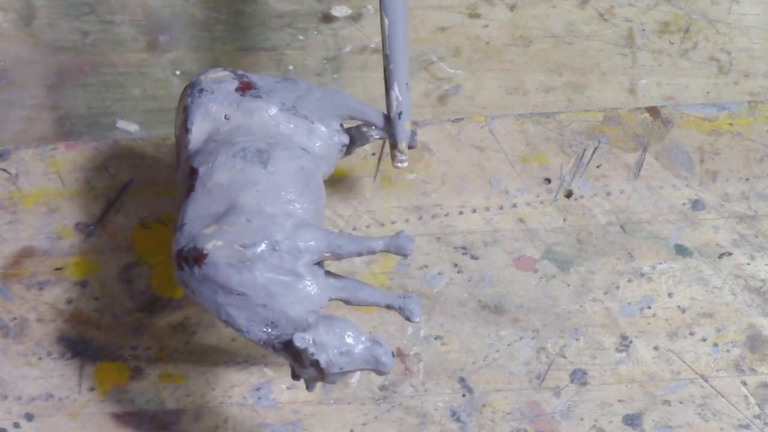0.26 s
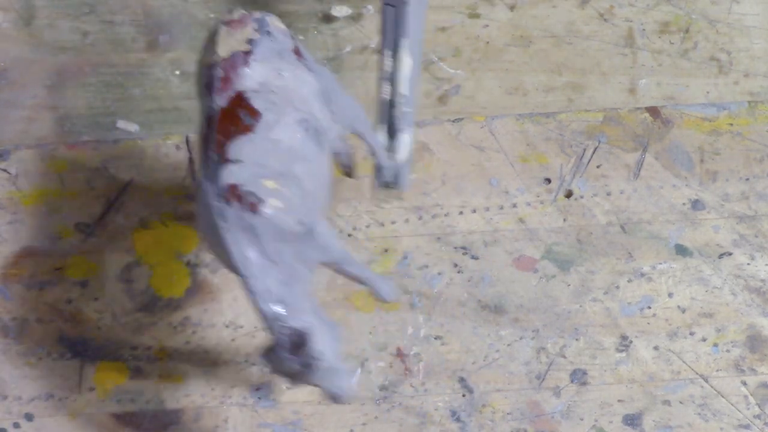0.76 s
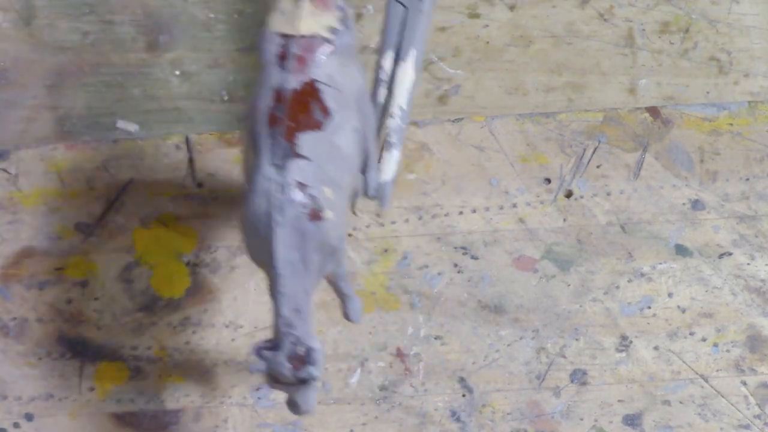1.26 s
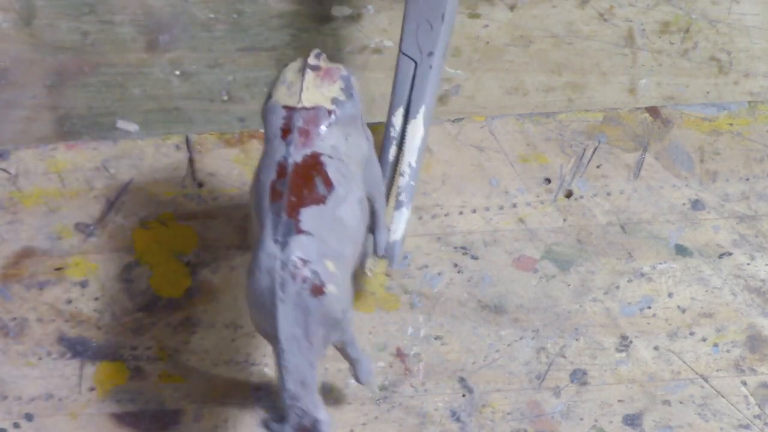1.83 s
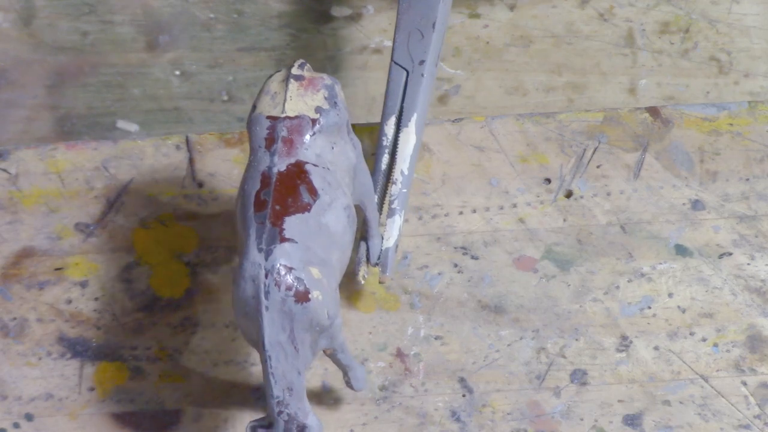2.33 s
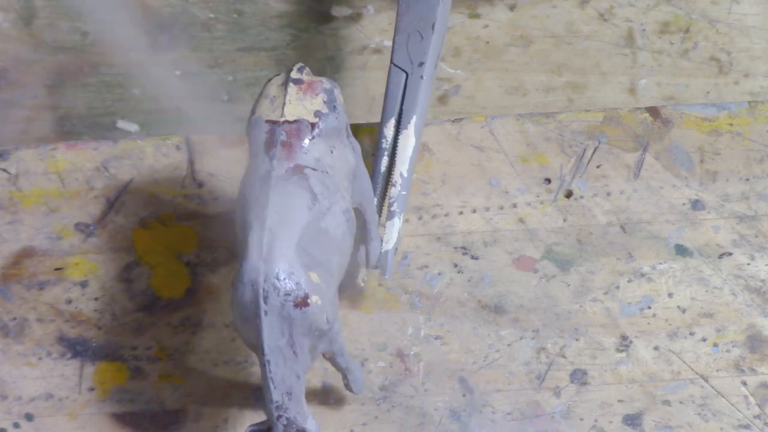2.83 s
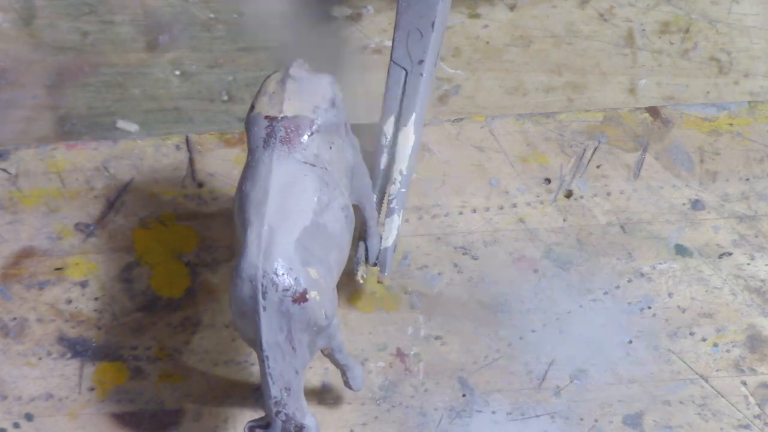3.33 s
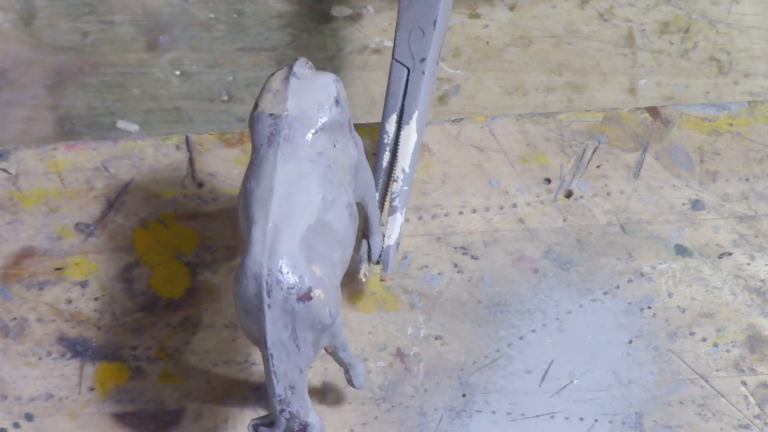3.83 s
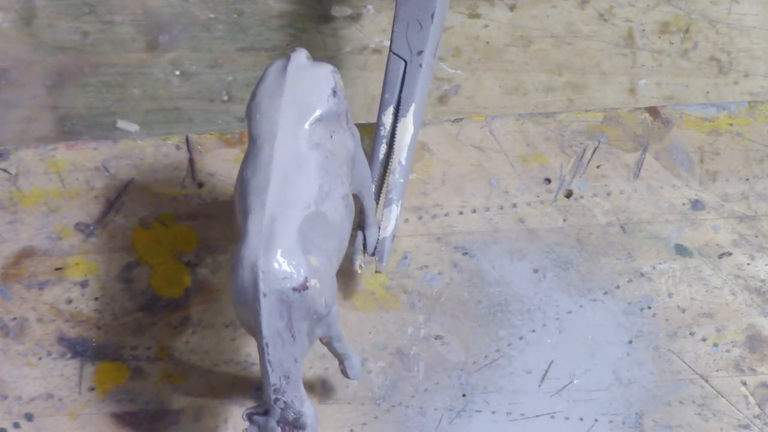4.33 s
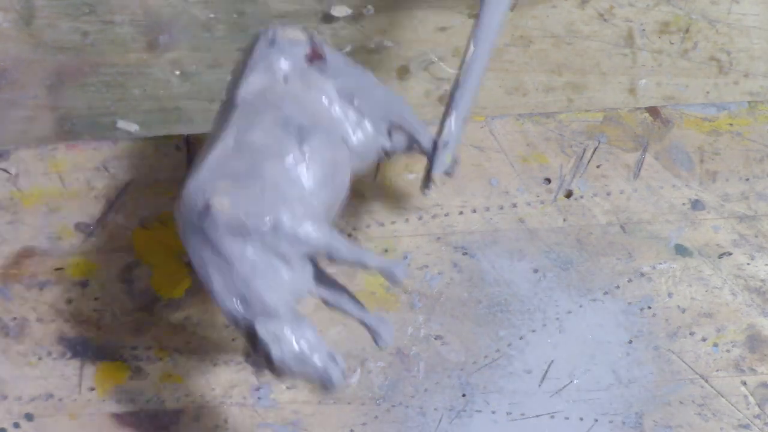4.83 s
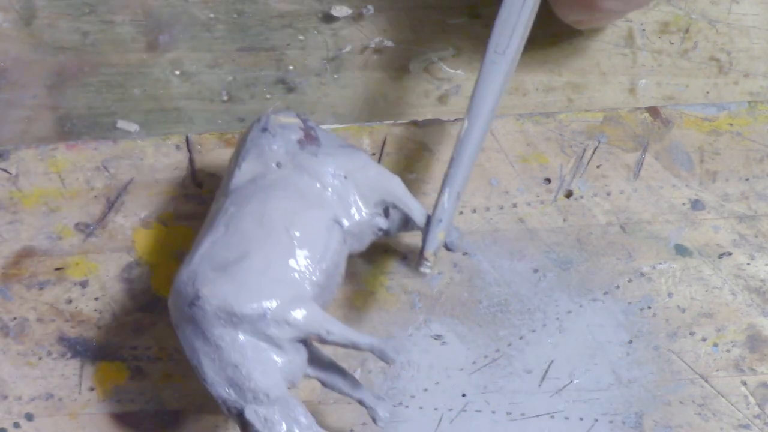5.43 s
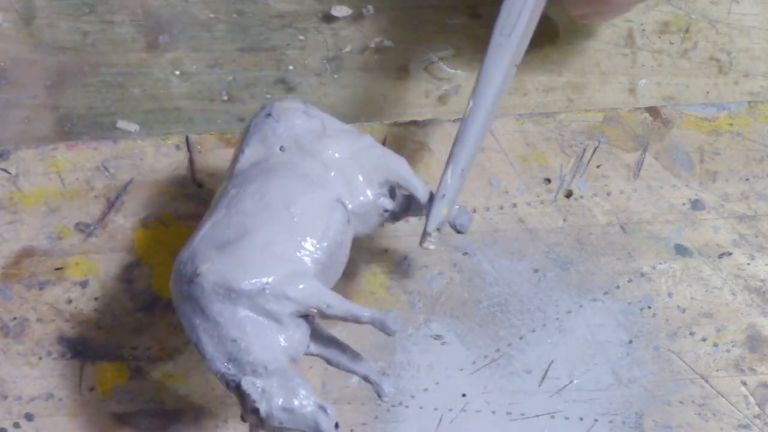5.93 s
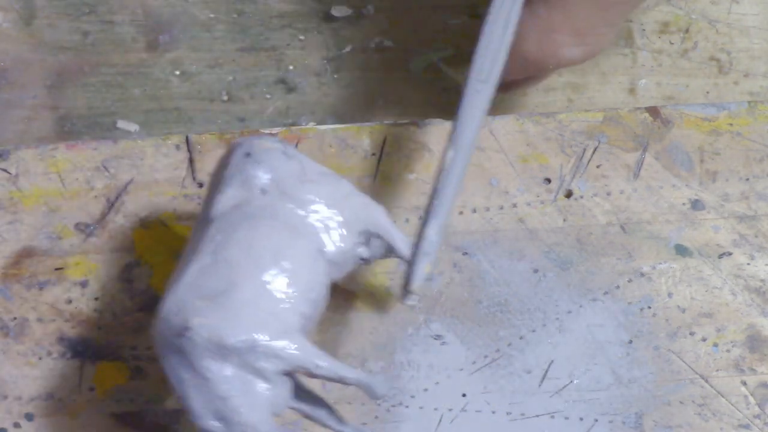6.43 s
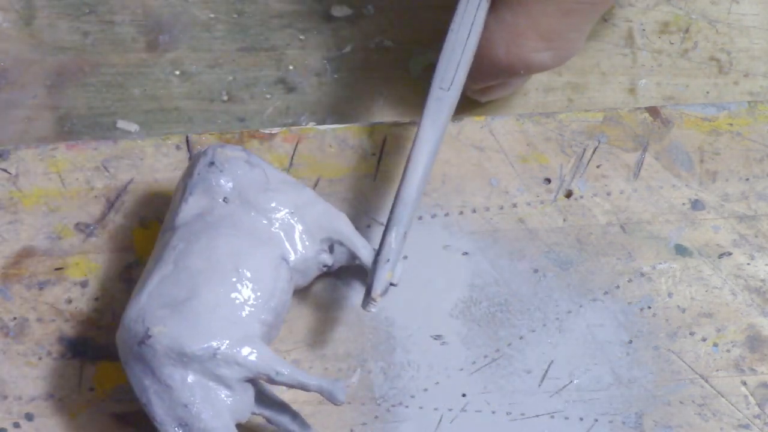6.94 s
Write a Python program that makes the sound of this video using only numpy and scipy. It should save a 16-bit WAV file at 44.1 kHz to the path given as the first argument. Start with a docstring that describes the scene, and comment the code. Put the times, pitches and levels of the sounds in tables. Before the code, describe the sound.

Hard metallic shaking of a paint can, its ball cracking and ringing, settles into ticks and is followed by seven brief, quiet aerosol bursts.

```python
"""A can of spray paint is shaken close to the microphone in a small workshop with a steady murmur.
Each stroke is noise cracks and ringing can modes as the ball hits, rebounds and skids; a limiter squashes it.
As the can is drawn back the room comes up, the rattle thins into light taps and low sine bubbles gurgle.
Seven short puffs of shaped noise follow, each a thin leak and then an open jet, with the ball ticking
in between."""
import sys
import numpy as np
from scipy import signal
from scipy.fft import rfft, irfft
from scipy.io import wavfile
from scipy.ndimage import uniform_filter1d

SR = 44100
rng = np.random.default_rng(int(sys.argv[2]) if len(sys.argv) > 2 else 0)


def unload_wav(signal):
    """Save mono or channel-first audio to the path in sys.argv[1] as 16-bit WAV at rate SR, clipped to [-1, 1]."""
    wavfile.write(
        sys.argv[1],
        SR,
        np.round(np.clip(np.atleast_2d(signal).T, -1, 1) * 32767).astype(np.int16),
    )


N = 316682

# spectrum of the workshop background: (frequency [Hz], relative density [dB per Hz])
FLOOR_COLOUR = [(15, -47), (25, -19.5), (120, -12), (157, -6), (190, -8), (223, -3), (354, -1.5), (416, -3),
                (451, -1), (754, -4), (1040, -6.5), (1230, -4.5), (3340, -14.5), (8830, -23), (16000, -39)]
# low-end fullness added to that background: (frequency [Hz], lift [dB])
BASS_FULLNESS = [(25, 0), (60, 1), (110, 6.5), (200, 3.5), (400, 1.5)]
# reverberation of the workshop: (frequency [Hz], t60 [s])
ROOM_DECAY = [(200, 0.75), (700, 0.75), (2000, 0.42), (5000, 0.41), (9000, 0.26), (15000, 0.32)]
# bubbles as the paint settles: (time [s], pitch [Hz], starting level [dB], t60 [s])
BUBBLES = [(2.056, 331, -40.5, 0.096), (2.093, 262.5, -43.5, 0.18), (2.150, 323, -48, 0.15),
           (2.184, 273, -51, 0.2)]
# rattle after the shaking stops: (time [s], base level of the taps [dB])
RATTLE_DECAY = [(0.92, -15), (0.936, -21), (1.048, -27), (1.18, -20.5), (1.214, -26), (1.282, -23),
                (1.482, -60), (1.768, -40), (1.92, -55)]
# knocks of the ball: single knocks of the loose ball, and a few late rebounds after strokes # (such as those at
# 0.472 and 0.488 s): (time [s], strike level [dB], tilt [dB per octave], # ring of the wall [dB], centre of a
# bright bump in the strike's colour [Hz], height of that bump [dB])
BALL_KNOCKS = [(0.0248, -20, 3, 17, 3100, -2), (0.0334, -2, 1, 5.5, 11600, 13), (0.059, 0, -2, 4, 6300, 9),
               (0.0746, 0, 1.5, -5, 11200, -2), (0.1717, 7.5, 3, 15, 10700, 5),
               (.405, 7.5, 2, -14, 5400, 1), (0.4209, 6, 1, -10, 3020, 7), (.472, 2, -2, 4, 8000, 13),
               (.488, -1.5, -3.5, -9, 10600, 8), (.5894, -4, -8, -10, 3620, 19),
               (0.674, -3, -0.5, 6, 3600, -7), (0.9153, 1, -2, -12, 5870, 11),
               (0.9702, -7.5, -2.5, 7, 9700, 8), (1.0117, -13.5, -0.5, 2, 4860, 6),
               (1.0716, -12.5, 3.5, 4, 7460, 8), (1.0903, -10, 1, 10, 6100, 4.5),
               (1.1343, -5, -1.5, 13, 10500, 1), (1.176, -10, 2, -5, 6160, 10.5),
               (1.279, -14.5, -0.5, 6, 6500, 9), (1.3378, -19.5, 0, 1.5, 6300, 1.5),
               (1.5678, -33, -2.5, 7, 10450, -3), (1.5814, -32.5, -1.5, -1, 3600, 5),
               (1.6613, -31, 2, -4.5, 4830, 5), (1.725, -32, -6, -8, 3030, 8),
               (1.758, -31.5, 1.5, -2, 6000, 7), (1.7882, -34.5, -3, 2.5, 3220, 28),
               (1.9715, -20, -3.5, 8.5, 7240, 8), (1.9963, -31, -7, 10, 6150, -2),
               (2.0276, -35.5, -2, -4, 4630, 8), (2.0763, -34.5, -6, 9, 8400, 7),
               (3.891, -31, 14, -6, 6010, 5), (4.2203, -26.5, 1, 8.5, 3710, 5),
               (4.2611, -32.5, 7, 3, 3690, 12.5), (4.3155, -37, 0, 5, 3850, 7.5),
               (5.5367, -31.5, 3, 4.5, 3870, 4), (5.5982, -41.5, 5, -15, 3800, 9),
               (5.9016, -32.5, -1, 3, 3850, 0.5), (5.91, -38, -1.9, 4, 2970, 10),
               (5.943, -36.5, 1.5, -5, 4050, 25), (6.9022, -23, 3, 1.5, 4130, 11.5),
               (6.9279, -29, 1.5, 0, 9100, 6)]
# presses of the nozzle: (time [s], leak time [s], opening time [s], open time [s], leak level [dB],
# jet level [dB], rush of the paint cone [dB], lower hump [Hz], upper hump [Hz],
# delay of the bounce off the sprayed figure [s])
PRESSES = [ (2.786, 0.028, 0.066, 0.11, -44, -32.5, -35, 7320, 9050, 0.0012),
           (3.302, 0.022, 0.033, 0.15, -46.5, -33, -37, 5280, 8900, 0.0018),
           (3.888, 0.011, 0.037, 0.13, -43, -32.5, -35, 7080, 9140, 0.001),
           (5.155, 0.046, 0.0095, 0.13, -44, -34, -38, 7700, 9630, 0.00093),
           (5.68, 0.058, 0.013, 0.056, -45.5, -34.5, -39, 7370, 10500, 0.001),
           (6.495, 0.049, 0.036, 0.14, -45.5, -33, -39.5, 6550, 9200, .00089),
           (6.937, 0.024, 0.078, 0.084, -39.5, -34, -36.5, 6600, 8950, 0.0011)]
# spectrum of the leaking valve: (frequency [Hz], relative density [dB per Hz])
LEAK_COLOUR = [(100, -9), (1500, -6), (3000, -5.5), (4500, 0.5), (8500, 3), (12000, -7), (16000, -13)]
# spectrum of the open jet: (frequency [Hz], relative density [dB per Hz])
JET_COLOUR = [(100, -16), (1500, -9.5), (3200, -18), (3800, -0.5), (4500, 0), (5000, -4), (5600, 3),
              (8000, 3), (11000, 1.5), (12000, -4), (14000, -8), (16000, -11)]
# spectrum of the rushing paint cone: (frequency [Hz], relative density [dB per Hz])
CONE_COLOUR = [(40, -24), (115, -24), (250, -3), (400, -1.5), (750, -5.5), (1150, -1.5), (1580, 2.5),
               (2000, 0), (2350, 2.5), (2800, -3.5), (5000, -1.5), (16000, -40)]
# colour of ball on tin: (frequency [Hz], relative density [dB per Hz])
STRIKE_COLOUR = [(40, -41), (160, -29.5), (290, -14.5), (480, -11), (800, -3.5), (1200, 6), (1900, 2.5),
                 (3000, 1), (4800, -2), (5800, 0.5), (8000, -6.5), (10000, -11.5), (13000, -23),
                 (16000, -32)]
# lasting modes of the can: (frequency [Hz], relative level [dB], t60 [s])
CAN_MODES = [(544, -21.5, .3), (892, -15.5, 0.41), (1340, -11.5, 0.1), (1400, -11, 0.1), (1800.5, -8, 0.32),
             (1930, -8.5, 0.084), (2260, -8.5, 0.19), (2447, 5, 0.17), (2330, -3, .17), (2592, -4, 0.041),
             (2468, -12, 0.057), (3436, -11.5, 0.15), (3620, -6, 0.29), (3900, -3.5, 0.23), (5742, -6, .1)]
# strokes of the hand, each throwing the ball against an end of the can: (time [s], strike level [dB],
# tilt [dB per octave], ring of the wall [dB], centre of a bright bump in the strike's colour [Hz],
# flight to the first rebound [s], ring on that rebound [dB], flight to the second rebound [s],
# skid length [s], skid level [dB], pitch of the scrape [Hz])
HAND_STROKES = [(0.0451, 3.5, 0.3, -2, 10860, 0.0049, -2, 0.0082, 0.016, -19, 2372),
                (0.1443, 14, 3, -0.5, 4832, 0.0066, 11, 0.0084, .062, -10.5, 2958),
                (0.2363, 7.5, -0.5, -2, 7530, 0.0066, -3.5, 0.0052, 0.049, -15, 1952),
                (0.366, 14, 3.5, 11.5, 4270, 0.0054, -9, 0.0032, 0.072, -12, 4215),
                (0.443, 8.5, -1.6, 9.5, 5500, 0.0095, -3, .0065, 0.036, -11, 2169),
                (0.5547, 17, 4, -3.5, 3550, 0.0043, -11.5, 0.018, 0.075, -8.5, 3511),
                (0.6385, 8, -0.3, 6.5, 5760, 0.0075, -4, 0.011, .045, -12.5, 2300),
                (.7281, 14.5, 1, 2, 5890, 0.016, 16, 0.021, 0.055, -7.5, 2920),
                (.798, 4.5, 3, -1, 4340, 0.0078, -19.5, 0.016, 0.042, -10, 3007),
                (0.8773, 2, -2, 17.5, 8200, 0.0052, -16, .008, 0.016, -40, 2300)]

FLOOR_DB = -57
# the first rebound is about as hard as the blow; the second glances off, slowed by the paint on its way
REBOUND_DB, DRAG_DB_PER_S, GLANCE_RING_DB = 0.5, 450, -2
# the skid starts just after the blow; each blow carries a faint low pulse
SKID_DELAY_S, PULSE_DB, PULSE_S = 0.009, -39, 0.0044
# after a knock the ball rolls a little
ROLL_S, ROLL_LOSS_DB, ROLL_HZ = 0.041, 28.5, 2800
CUTOFF_HZ = 15850
T = np.arange(N) / SR
# frequencies [Hz] and times [s] of the short-time spectra of one puff
BINS = np.fft.rfftfreq(256, 1 / SR)
FRAMES = np.arange(300)[:, None] * 64 / SR


def amp(db):
    """Decibels to gain."""
    return 10 ** (np.asarray(db) / 20)


def unit(x):
    """Scales to rms 1."""
    return x / np.sqrt(np.mean(x ** 2) + 1e-20)


def read(points, hz):
    """Reads a table on a log-frequency axis."""
    f, value = np.transpose(points)
    return np.interp(np.log(hz + 1), np.log(f + 1), value)


def hump(hz, centre_hz, width_hz):
    """A resonance-shaped bump of height 1."""
    return 1 / (1 + (2 * (hz - centre_hz) / width_hz) ** 2)


def add(mix, s, sound):
    """Mixes a sound in at time s [s]."""
    part = mix[max(round(s * SR), 0):][:len(sound)]
    part += sound[:len(part)]


def noise(level_db, size):
    """Noise of rms 1 coloured by the function level_db(Hz)."""
    spectrum = rfft(rng.standard_normal(size))
    return unit(irfft(spectrum * amp(level_db(np.fft.rfftfreq(size, 1 / SR))), size))


def waver(rate_hz, size):
    """Random motion of rms 1, mostly slower than rate_hz."""
    return noise(lambda hz: -20 * np.log10(1 + (hz / rate_hz) ** 2), size)


def evolving(level_db):
    """Noise of rms 1 whose spectrum changes from frame to frame."""
    real, imaginary = rng.standard_normal((2, *level_db.shape))
    z = (real + 1j * imaginary) * amp(level_db)
    return unit(signal.istft(z.T, nperseg=256, noverlap=192)[1])


def causal(level_db):
    """The sharpest causal (minimum-phase) impulse response with this spectrum."""
    log_gain = np.log(amp(np.r_[level_db, level_db[-2:0:-1]]))
    return np.fft.ifft(np.exp(np.conj(signal.hilbert(log_gain)))).real


def ramp(t, start, length):
    """A smooth step from 0 to 1."""
    return np.sin(np.pi / 2 * np.clip((t - start) / max(length, 1e-3), 0, 1)) ** 2


def background():
    """The steady workshop: coloured noise whose level wavers slightly."""
    murmur = noise(lambda hz: read(FLOOR_COLOUR, hz) + read(BASS_FULLNESS, hz), N)
    return amp(FLOOR_DB + 0.59 * waver(6, N)) * murmur


def workshop(x, tail_db, bench_db, build_s=0.0051):
    """Adds a few quick reflections from the bench and a diffuse tail whose bands decay at their own rates."""
    size = SR * 3 // 4
    hz, t, z = signal.stft(rng.standard_normal(size), SR, nperseg=256)
    decay = amp(-60 * t / read(ROOM_DECAY, hz)[:, None])
    tail = signal.istft(z * decay, SR, nperseg=256)[1][:size]
    tail = unit(tail * ramp(np.arange(size) / SR, 0.00076, build_s)) / np.sqrt(size)
    bench = np.zeros(size)
    arrivals = (SR * rng.uniform(0.002, 0.014, size=8)).astype(int)
    bench[arrivals] = rng.choice([-1, 1], size=8) / np.sqrt(8)
    diffuse = signal.fftconvolve(amp(tail_db) * x, tail)
    reflections = signal.fftconvolve(amp(bench_db) * x, bench)
    return x + (diffuse + reflections)[:N]


def gurgle():
    """Large bubbles ring low inside the can as decaying sines."""
    out, t = np.zeros(N), np.arange(SR // 4) / SR
    for s, hz, db, t60 in BUBBLES:
        add(out, s, amp(db - 60 * t / t60) * ramp(t, 0, 0.009) * np.sin(2 * np.pi * hz * t))
    return out


def settling(over_db=3.5, spread_db=1.5, tilt_db=-0.7, ring_db=2, count=50):
    """Light, uneven taps of the ball as it comes to rest."""
    out, (times, levels) = np.zeros(N), np.transpose(RATTLE_DECAY)
    steps = (np.arange(count) + rng.random(count)) / count  # one tap at random in each equal slot
    for s in times[0] + (times[-1] - times[0]) * steps:
        db = np.interp(s, times, levels) + over_db + spread_db * rng.standard_normal()
        add(out, s, stray(db, tilt_db, ring_db))
    return out


def knocking():
    """The ball knocks, loose as the can moves or rebounding late after a stroke, and rolls on briefly."""
    out = np.zeros(N)
    for s, db, tilt_db, ring_db, bright_hz, bright_db in BALL_KNOCKS:
        add(out, s, strike(db, tilt_db, ring_db, bright_hz, bright_db))
        add(out, s, amp(db - ROLL_LOSS_DB) * skid(ROLL_S, ROLL_HZ))
    return out


def puff(leak_time, opening, open_time, leak_db, jet_db, cone_db, low_hz, high_hz, bounce_s):
    """The valve leaks, opens into a sputtering jet over the rush of the paint cone, and closes."""
    # nearly constant within a puff: its colour sits about 1 % higher or lower
    shift = 1 + 0.0094 * waver(5, len(FRAMES))[:, None]
    # the hiss bounces off the sprayed figure, which combs the spectrum
    comb_db = 2.1 * np.cos(2 * np.pi * BINS * bounce_s * shift)
    # patches of the spectrum flutter, smoothed over 18 frames and 2 bins
    patches = uniform_filter1d(rng.standard_normal(comb_db.shape), size=18, axis=0)
    flutter_db = 2.4 * unit(uniform_filter1d(patches, size=2, axis=1))
    humps_db = 4 * hump(BINS, low_hz * shift, 800) + 4.9 * hump(BINS, high_hz * shift, 560)
    # the top of the hiss comes last, as the paint atomises fully
    dull_db = -4 * (1 - ramp(FRAMES, leak_time, 0.061)) * np.clip((BINS - 9000) / 4000, 0, 1)
    jet = amp(jet_db) * evolving(read(JET_COLOUR, BINS) + humps_db + comb_db + flutter_db + dull_db)
    size = len(jet)
    t = np.arange(size) / SR
    leak_hiss = evolving(read(LEAK_COLOUR, BINS) + comb_db + flutter_db)
    leak = amp(leak_db + 0.5 * waver(90, size)) * leak_hiss

    def cone_level(hz):
        # the flow also sets the can wall ringing
        wall_db = 6.8 * hump(hz, 2350, 50.8) + 5 * hump(hz, 2403, 49.7) + 3 * hump(hz, 1640, 141)
        return read(CONE_COLOUR, hz) + wall_db
    cone = amp(cone_db) * noise(cone_level, size)
    sputter = amp(1.1 * waver(40, size) + 0.74 * waver(490, size))
    flow = ramp(t, leak_time, opening) * sputter
    pressed = ramp(t, 0, 0.0081) * (1 - ramp(t, leak_time + open_time - 0.006, 0.03))
    return pressed * (leak + flow * (jet + cone))


def spray():
    """All presses of the nozzle."""
    out = np.zeros(N)
    for s, *press in PRESSES:
        add(out, s, puff(*press))
    return out


def skid(length, scrape_hz, contacts_per_s=900, scrape_db=8):
    """The ball chatters along the tin in a stream of tiny contacts."""
    size, hz = SR // 6, np.fft.rfftfreq(1024, 1 / SR)
    t = np.arange(size) / SR
    contacts = (rng.random(size) < contacts_per_s / SR) * rng.exponential(size=size)
    envelope = signal.fftconvolve(contacts, np.exp(-t / 0.0015))[:size]
    chatter = envelope * rng.standard_normal(size)
    colour = read(STRIKE_COLOUR, hz) + scrape_db * hump(hz, scrape_hz, 1400)
    scrape = signal.fftconvolve(chatter, causal(colour))[:size]
    return unit(scrape) * ramp(t, 0, 0.011) * (1 - ramp(t, length - 0.02, 0.024))


def strike(db, tilt_db, ring_db, bright_hz, bright_db, crack_s=0.0014, shiver_s=0.014, shiver_db=-17,
           modes_db=-28, crest_db=7):
    """A noise crack for many damped shell modes, a brief shiver of the tin, and a few lasting tones."""
    t, hz = np.arange(SR // 3) / SR, np.fft.rfftfreq(1024, 1 / SR)
    mode_hz, mode_db, mode_t60 = np.transpose(CAN_MODES)[:, :, None]
    # hard blows bring out the higher wall modes and have a broader bright bump
    wall_hz = np.interp(db, [-10, 10], [2340, 2520])
    spread = np.interp(db, [-10, 15], [0.28, 0.55])
    colour = read(STRIKE_COLOUR, hz) + tilt_db * np.log2(np.clip(hz, 1000, 9000) / 3000)
    colour += (7 + ring_db) * hump(hz, wall_hz, 370)
    colour += bright_db * hump(hz, bright_hz, spread * bright_hz)
    buzz_db = shiver_db + np.interp(db, [-5, 12], [-3, 1])  # hard blows buzz more
    shiver = amp(buzz_db) * np.exp(-t / shiver_s)
    burst = rng.standard_normal(len(t)) * (np.exp(-t / crack_s) + shiver)
    crack = signal.fftconvolve(burst, causal(colour))[:len(t)]
    crack /= np.sqrt(np.mean(crack[:128] ** 2))  # rms 1 over the first 3 ms
    # the place of contact sets how strongly each mode is struck; moving paint detunes the wall
    strength, detune = rng.standard_normal((2, len(CAN_MODES), 1))
    phase = rng.random((len(CAN_MODES), 1))
    struck_db = mode_db + 3 * strength
    cycles = mode_hz * (1 + 0.0044 * detune) * t + phase
    tones = amp(struck_db - 60 * t / mode_t60) * np.sin(2 * np.pi * cycles)
    damped_db = np.interp(db, [-30, 0], [3, -1])  # sloshing paint damps the wall on hard strokes
    lasting_db = damped_db + 0.55 * ring_db
    return amp(db - crest_db) * (crack + amp(modes_db + lasting_db) * tones.sum(0))


def stray(db, tilt_db, ring_db, tilt_spread_db=1.6, ring_spread_db=3, low_hz=3300, high_hz=10500,
          bright_db=7):
    """A strike of random tilt, ring and bright bump."""
    tilt, ring = rng.standard_normal(2)
    bright_hz = low_hz * (high_hz / low_hz) ** rng.random()
    return strike(db, tilt_db + tilt_spread_db * tilt, ring_db + ring_spread_db * ring, bright_hz, bright_db)


def shaking(bright_db=13, rebound_bright_db=9):
    """Each stroke is a blow with a faint low pulse, a rebound, a weaker one, and a skid."""
    out, u = np.zeros(N), np.arange(SR // 10) / SR / PULSE_S
    for (s, db, tilt_db, ring_db, bright_hz, flight, rebound_ring_db, next_flight,
         length, skid_db, scrape_hz) in HAND_STROKES:
        add(out, s, strike(db, tilt_db, ring_db, bright_hz, bright_db))
        add(out, s, amp(db + PULSE_DB) * (1 - u) * np.exp(-u))
        # the rebound's bright bump sits at the pitch of the scrape
        rebound = strike(db + REBOUND_DB, tilt_db, rebound_ring_db, scrape_hz, rebound_bright_db)
        add(out, s + flight, rebound)
        glance = stray(db - DRAG_DB_PER_S * next_flight, tilt_db, GLANCE_RING_DB)
        add(out, s + flight + next_flight, glance)
        add(out, s + SKID_DELAY_S, amp(skid_db) * skid(length, scrape_hz))
    return out


def scene():
    """Can and spray in the room, over its steady background."""
    # the can is close while it is shaken, then drawn back to aim, so the room comes up
    room_db = np.interp(T, [0.85, 1.2], [-9.5, -6])
    can = workshop(shaking() + knocking() + settling() + gurgle(), tail_db=room_db, bench_db=-11.0)
    puffs = workshop(spray(), tail_db=-7, bench_db=-5.5)
    return (can + puffs + background())[None]


def record(dry, limit_db=-12.0, recover_db_per_s=300, sense_s=0.0037, attack_s=0.0001, slope=0.76,
           low_cut_hz=140):
    """A fast limiter lets the first instant of a strike clip softly; then a low cut and a band limit."""
    def lag(x, seconds):
        """One-pole smoothing."""
        r = np.exp(-1 / (seconds * SR))
        return signal.lfilter([1 - r], [1, -r], x)
    level_db = 10 * np.log10(lag(dry[0] ** 2, sense_s) + 1e-12)
    over_db = np.maximum(level_db - limit_db, 0)
    # the overshoot is held, then falls at a steady rate
    recovery_db = recover_db_per_s * T
    held_db = np.maximum.accumulate(over_db + recovery_db) - recovery_db
    limited = np.tanh(dry[0] * amp(-slope * lag(held_db, attack_s)))
    lean = limited - 0.68 * lag(limited, 1 / (2 * np.pi * low_cut_hz))  # a partial cut, as a shelf
    low_pass = signal.firwin(401, CUTOFF_HZ, window=("kaiser", 8), fs=SR)
    return signal.fftconvolve(lean, low_pass, "same")[None]


dry = scene()
out = record(dry)
unload_wav(out)
```